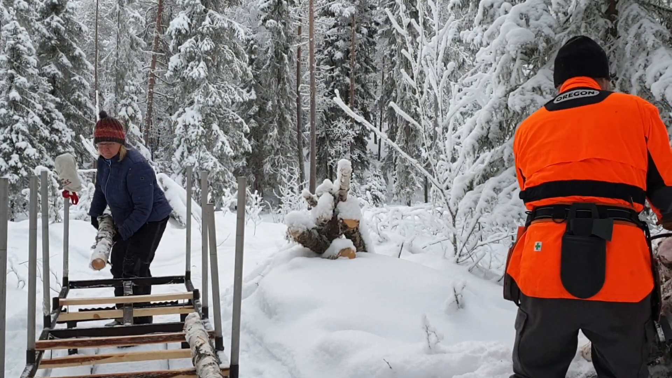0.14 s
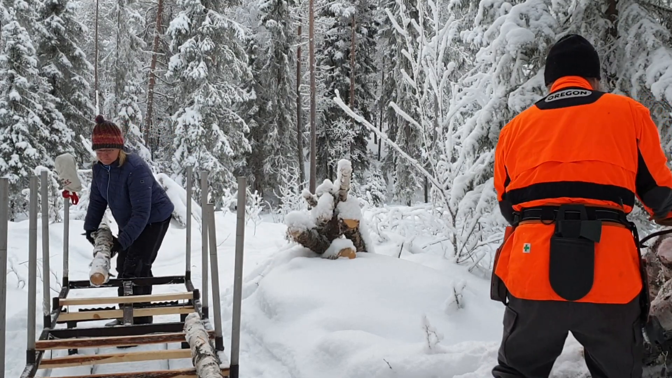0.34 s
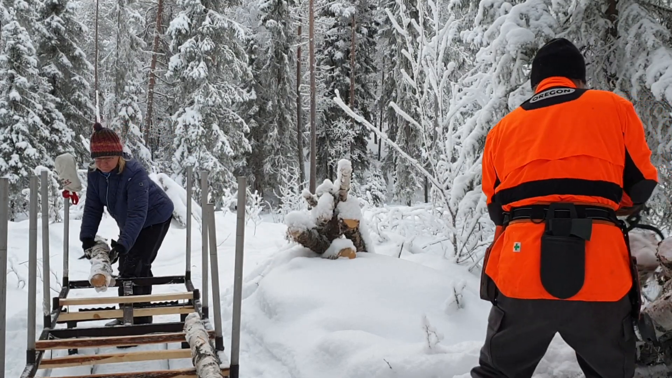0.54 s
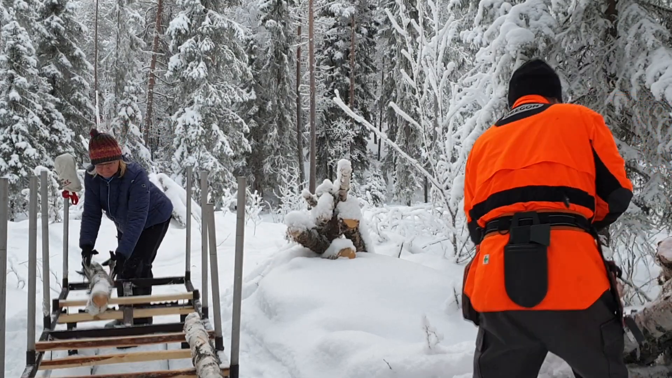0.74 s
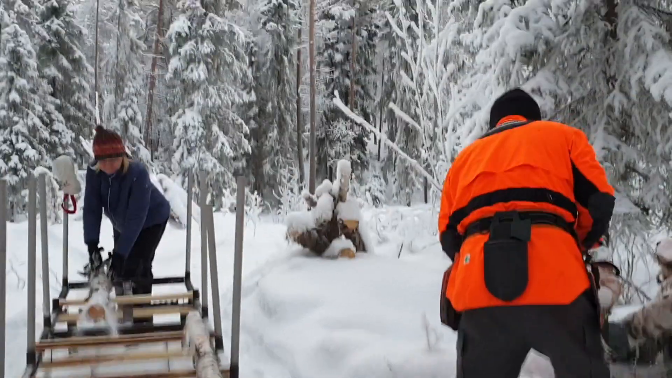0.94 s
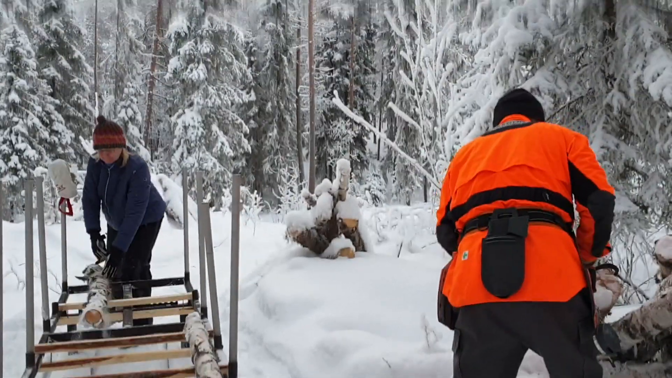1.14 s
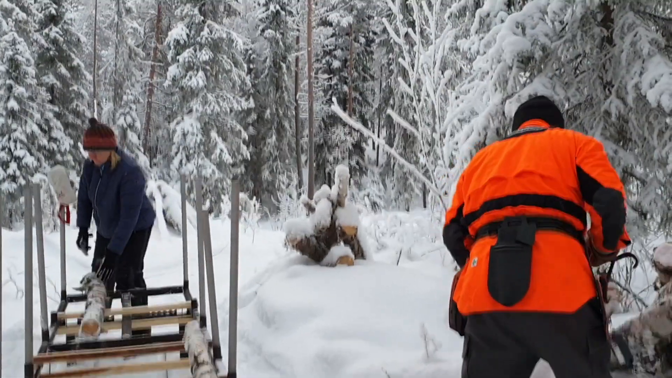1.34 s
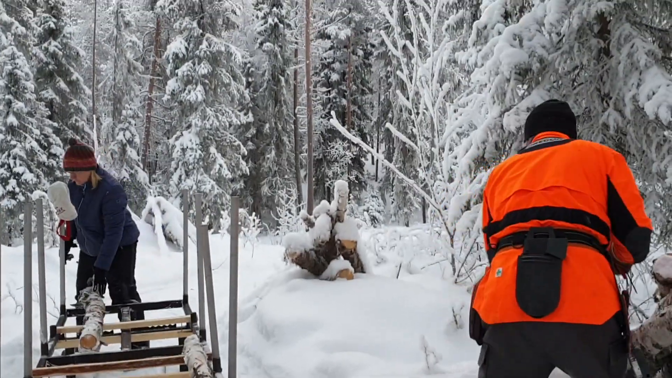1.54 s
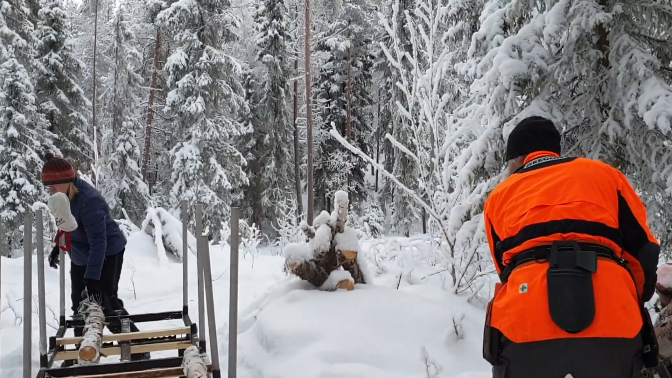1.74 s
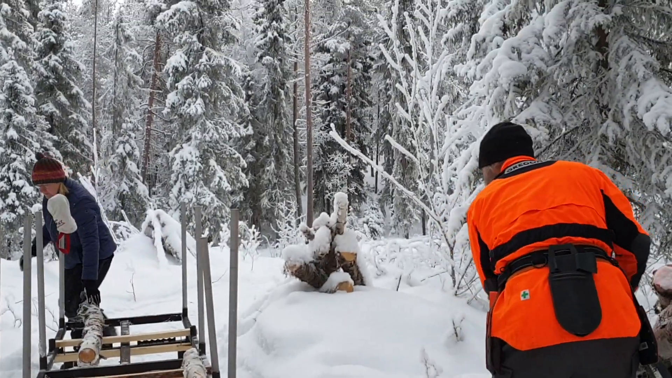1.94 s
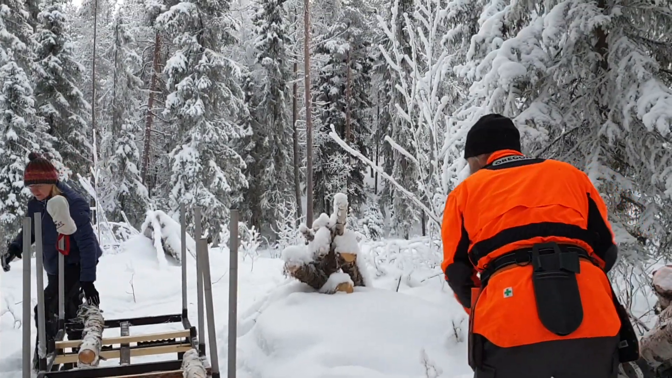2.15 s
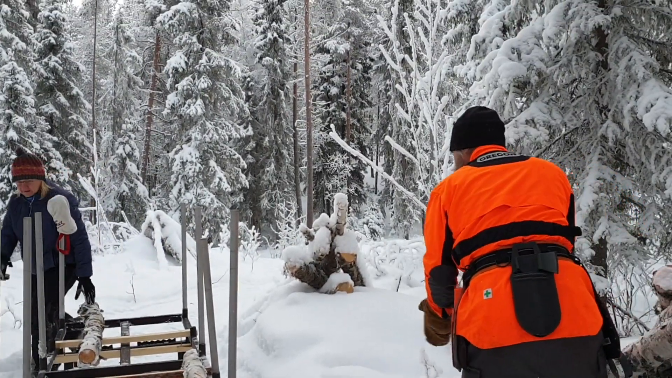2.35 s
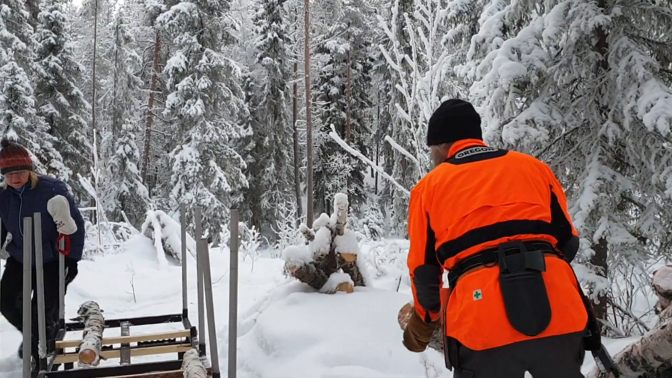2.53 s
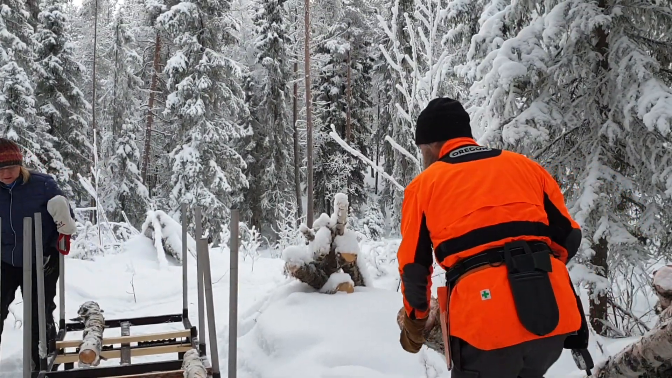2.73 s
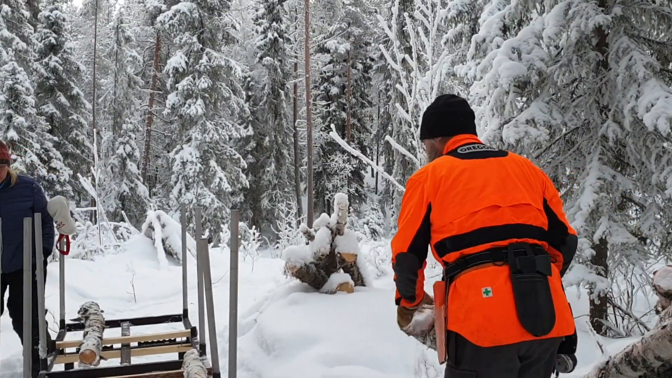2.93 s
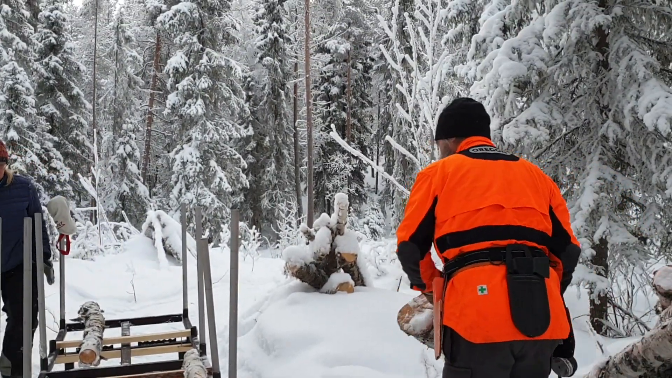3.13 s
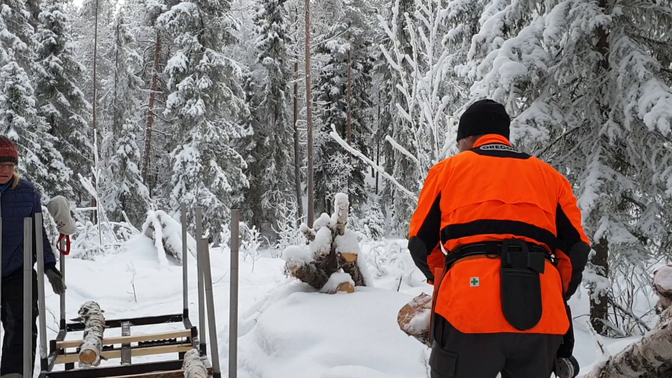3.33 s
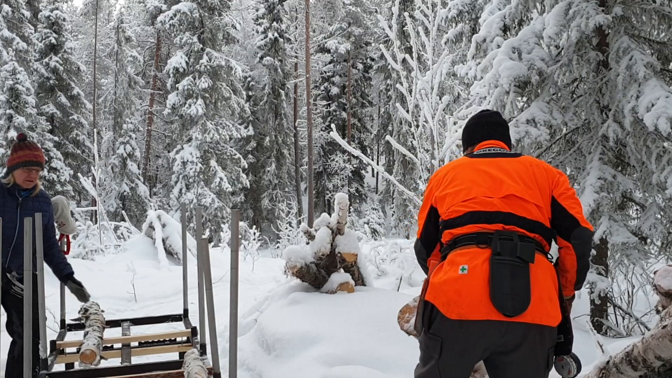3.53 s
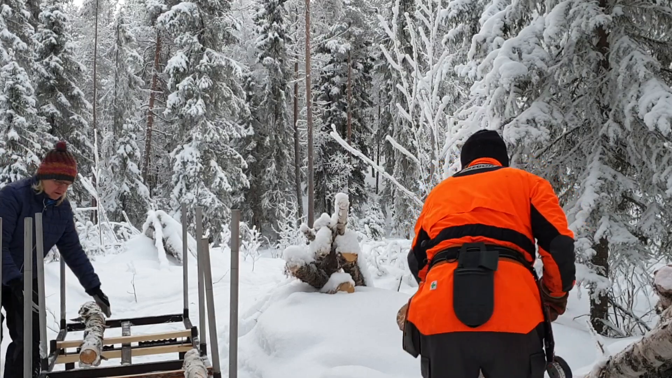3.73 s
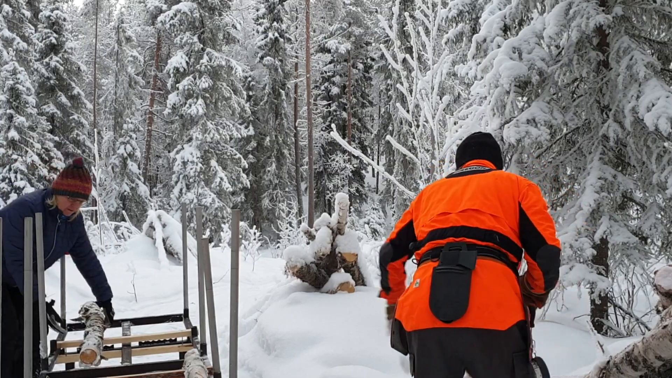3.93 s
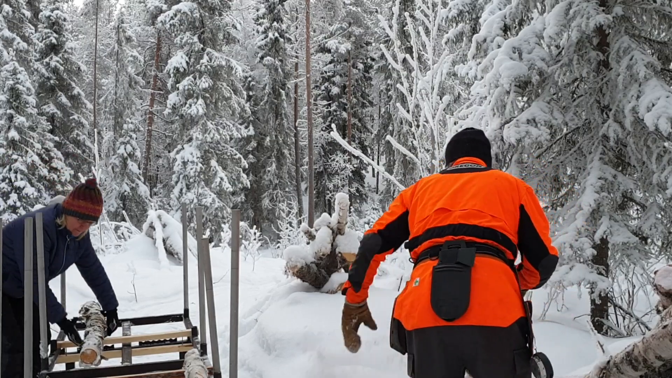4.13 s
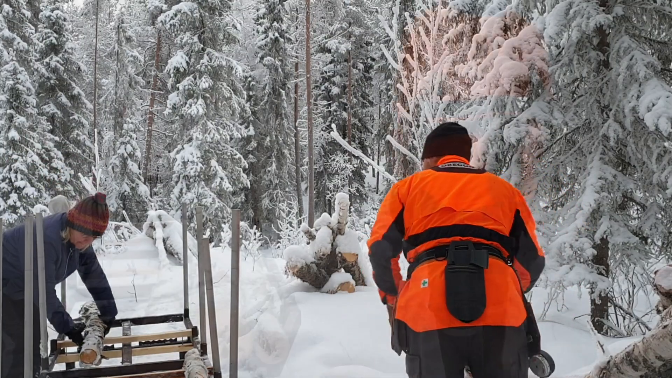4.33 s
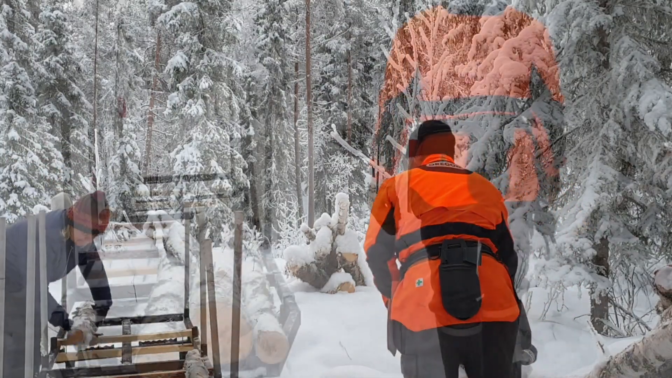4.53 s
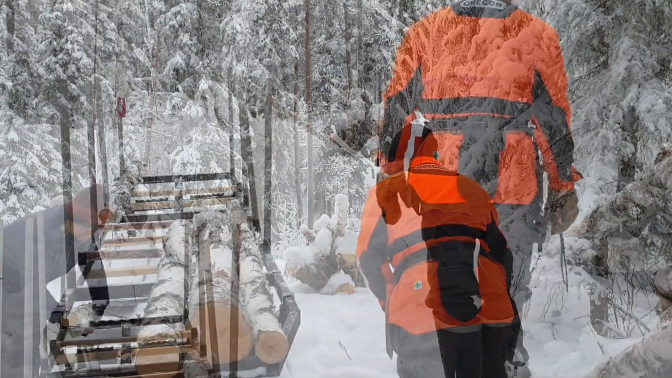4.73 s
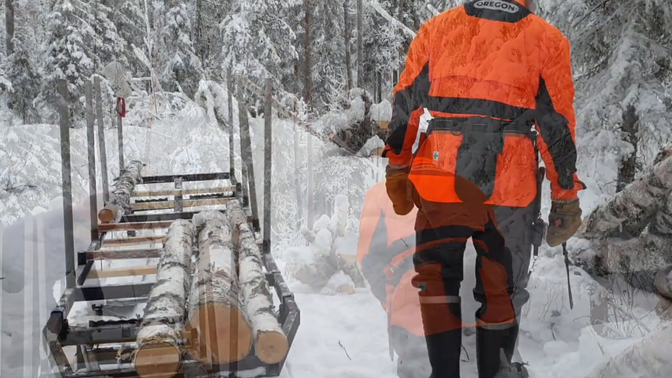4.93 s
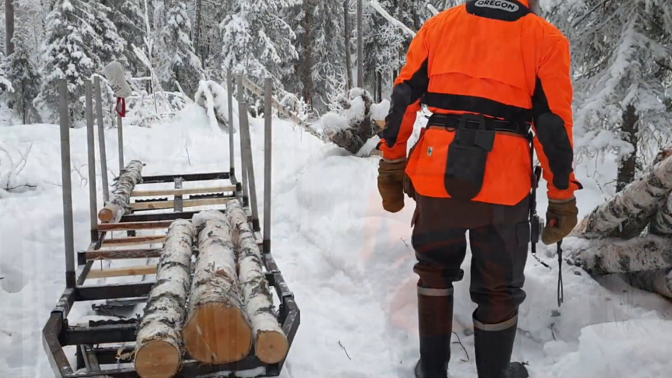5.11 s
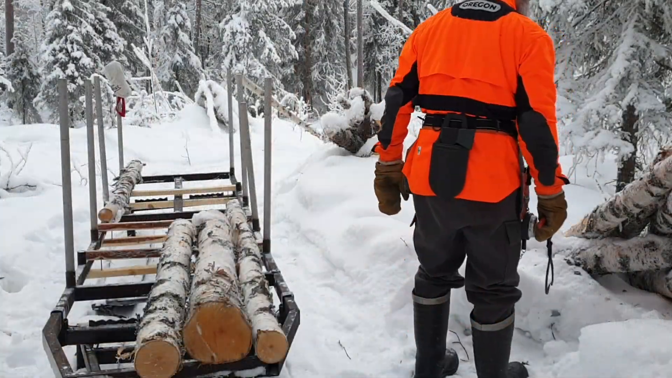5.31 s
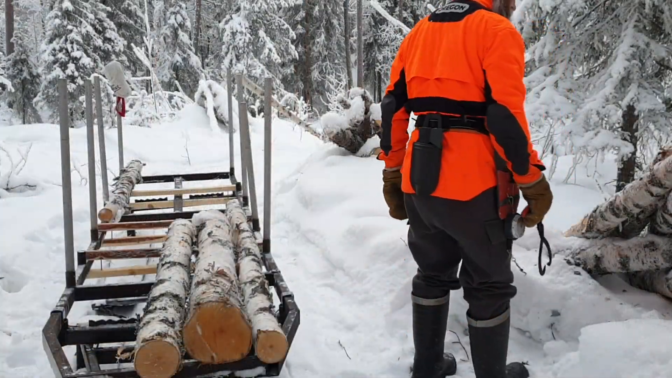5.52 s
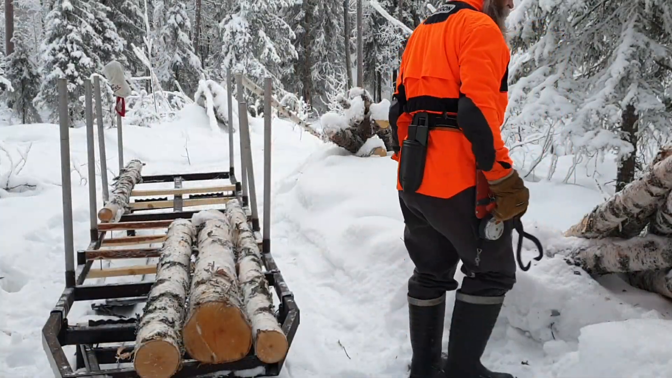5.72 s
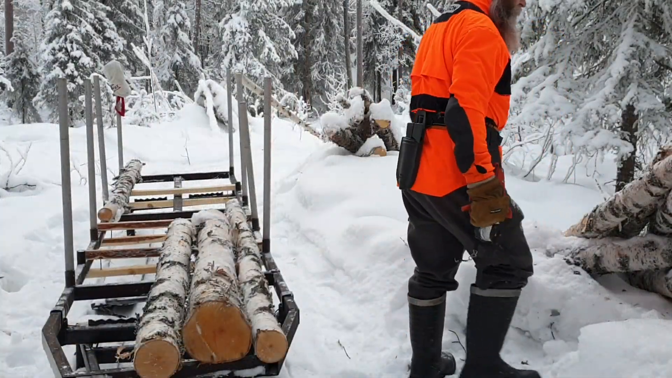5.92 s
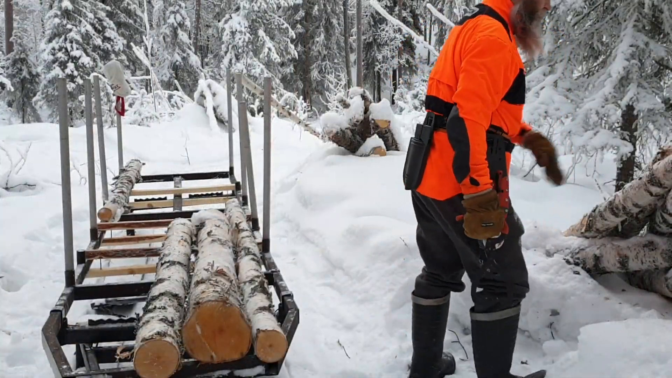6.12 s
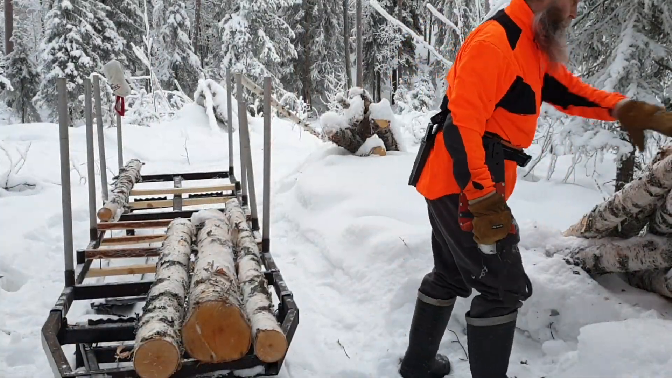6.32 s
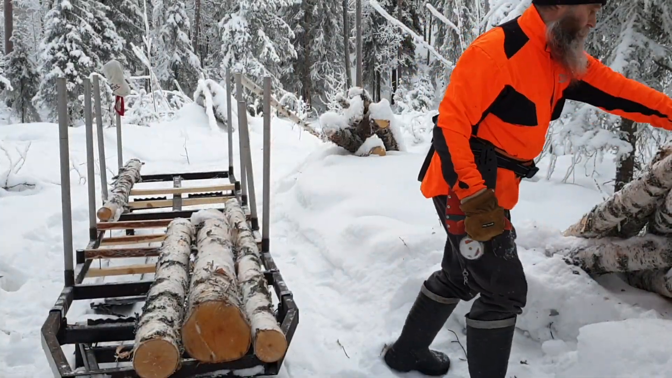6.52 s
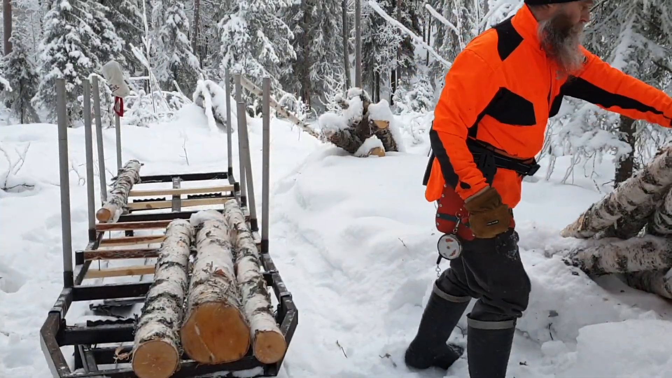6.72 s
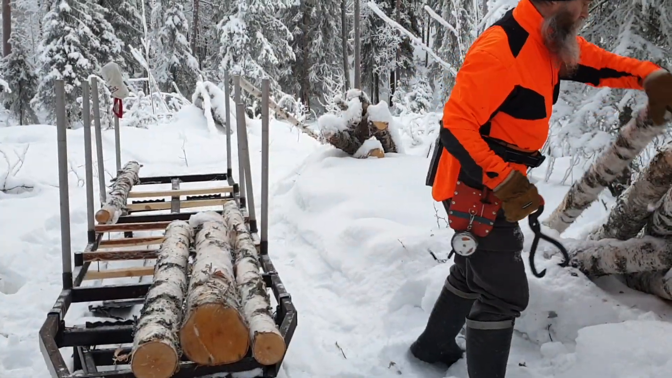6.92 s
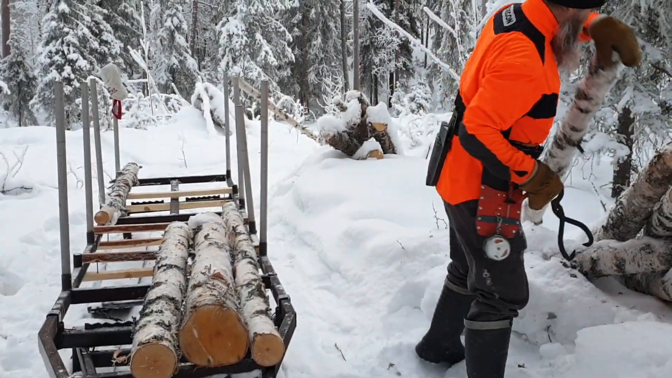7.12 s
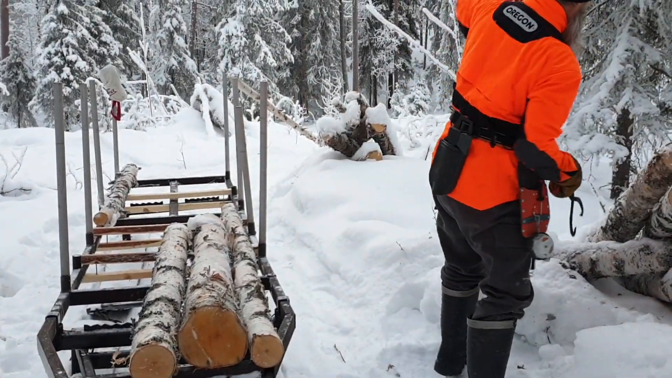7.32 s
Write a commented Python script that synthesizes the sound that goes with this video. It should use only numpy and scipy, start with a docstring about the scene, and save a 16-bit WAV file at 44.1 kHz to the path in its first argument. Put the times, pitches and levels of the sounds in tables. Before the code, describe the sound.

A heavy log crashes onto a slatted steel sled and bounces, overloading the microphone; then snow crunches, tools clink, and another log softly knocks.

```python
"""Snowy forest: a log is dropped on a slatted steel sled and bounces; later another is shifted and knocks.
Blows ring damped frame and wood modes and throw enveloped noise; belt tools clink as chattering contacts.
Boots press the snow and bark rasps as ringing grains; stiff clothes rustle as flickering noise.
Dull echoes follow the hits, faint air noise lies below, and the loudest blows overload the recorder."""
import sys
import numpy as np
from scipy import signal
from scipy.io import wavfile

SR = 44100
rng = np.random.default_rng(int(sys.argv[2]) if len(sys.argv) > 2 else 0)


def pcm_store(signal):
    """Save signal as 16-bit PCM."""
    levels = np.round(np.clip(np.atleast_2d(signal), -1, 1) * 32767)
    wavfile.write(sys.argv[1], SR, levels.astype(np.int16).T)


N = 328986

# All table levels are drives, ahead of later gains and filters.
# log blows; the tilt follows where the log lands, the spray is bark and snow:
# start_s, boom_db, boom_tilt_db_per_octave, knock_db, spray_db
LOG_BLOWS = [(0.750, 1.5, 0, -6, -18), (0.796, 1, -9, -7.5, -17.5), (0.832, -5.5, -12.5, -21, -15.5),
             (0.862, -6, -1, -14.5, -27), (0.909, -9.5, -11, -24.5, -42), (0.945, -2.5, 5, -16.5, -32),
             (1.071, -10, 6, -24, -26), (1.114, -5, -7, -23, -55), (1.271, -16, -3, -35, -52),
             (1.313, -10.5, 7.5, -23, -31.5), (1.349, -12, 7.5, -31, -74), (1.528, -18.5, 3, -24, -42),
             (4.339, -32.5, -7, -37, -60), (4.452, -16, 5.5, -28.5, -39), (4.502, -20, 4.5, -43, -48),
             (4.586, -18, -0.5, -28, -44.5), (4.786, -21, -0.5, -25, -39.5), (4.811, -26, -3, -39, -52),
             (5.026, -29, 6, -31.5, -46), (7.038, -31, 4, -37, -42.5)]
# steel frame modes: pitch_hz, level_db, t60_s
FRAME_MODES = [(52.3, -21.5, 0.14), (84, -13, 0.084), (103.4, -2, 0.3), (129, -0.5, 0.093),
               (184.25, -3.5, 0.32), (226.4, -9, 0.2)]
# log wood modes: pitch_hz, level_db, t60_s
WOOD_MODES = [(300, 8.5, 0.032), (349, 0, 0.097), (454, 4, 0.058), (504.8, 4, 0.043), (629, 0, 0.039),
              (728.5, -4.5, 0.08), (966, -6, 0.033)]
# bark and snow spray spectrum: freq_hz, density_db_per_hz
SPRAY_SPECTRUM = [(590, -23.5), (1000, 3.5), (1560, -1), (15500, -19)]
# small dry knocks and snaps of wood and crust: start_s, level_db, pitch_hz
DRY_KNOCKS = [(0.099, -26, 545), (0.205, -23, 566), (0.458, -31, 664), (1.675, -25, 714),
              (1.812, -21.5, 970), (2.174, -18.5, 70), (2.527, -25, 546), (2.838, -29, 590),
              (3.27, -27.5, 457), (4.202, -27, 1180), (4.25, -29, 626), (6.332, -20.5, 4340),
              (6.691, -29.5, 350), (6.99, -28.5, 313), (7.0383, -12.5, 247), (7.0404, -15, 935),
              (7.043, -21, 362), (7.101, -42, 404), (7.159, -31, 350), (7.252, -30, 300), (7.289, -31, 316),
              (7.326, -29, 280), (7.388, -32.5, 268)]
# metal tools touching: start_s, level_db
TOOL_CLINKS = [(0.705, -26), (1.1978, -19.5), (1.224, -27.5), (1.28, -22), (1.329, -11.5), (1.362, -18.5),
               (1.337, -25), (1.452, -16), (1.552, -29.5), (1.585, -28.5), (1.673, -29.5), (1.717, -30),
               (1.774, -32.5), (1.813, -28), (2.5464, -23.5), (2.613, -16.5), (2.978, -33), (4.485, -28),
               (4.588, -21.5), (4.811, -25.5), (5.7695, -35.5)]
# metal tool modes: pitch_hz, level_db, t60_s
TOOL_MODES = [(3700, -5, .008), (5900, -6, .008), (8300, -5, 0.015), (10700, -8, .035), (13450, -6, .015)]
# steel stake struck: start_s, level_db
STAKE_PINGS = [(.87, -36), (.975, -36), (1.38, -50), (1.82, -50), (4.455, -46)]
# steel stake mode: pitch_hz, level_db, t60_s
STAKE_MODES = [(2846, -4, 0.4)]
# bark and crust rasping: start_s, end_s, level_db, pitch_hz
BARK_RASPS = [(0.971, 1.016, -34.5, 2640), (3.727, 3.812, -41, 1020), (3.85, 3.956, -45, 1290),
              (3.964, 4.01, -43, 2170), (4.443, 4.496, -50, 2700), (4.865, 4.912, -38, 1680),
              (5.966, 6.013, -47, 1580), (6.277, 6.683, -56, 1530)]
# shuffling underfoot and of clothes: time_s, rumble_db, crunch_db, rustle_db
SHUFFLE_LEVELS = [(0, -51, -56, -63.5), (.4, -42, -56.5, -55.5), (1.502, -37.5, -44, -50.5),
                  (1.95, -46, -53.5, -68), (2.698, -53, -57, -57.5), (3.362, -50.5, -65, -68),
                  (3.44, -46, -51, -60.5), (4.1, -53.5, -48, -53), (4.25, -39, -57.5, -58),
                  (5.1, -38.5, -60, -59), (5.199, -75, -88.5, -82), (5.33, -84, -77, -67.5),
                  (5.902, -86.5, -74.5, -64), (6.041, -54.5, -59, -62.5), (6.3, -53.5, -58, -54),
                  (7.46, -56, -56.5, -55.5)]
# boots pressing the snow: start_s, length_s, packing_db, crust_db
BOOT_STEPS = [(0.085, 0.086, -39, -46), (0.168, 0.12, -67, -43), (0.655, 0.84, -37, -37.5),
              (2.176, 0.16, -42.5, -54), (2.482, 0.089, -43, -50), (2.832, 0.12, -45, -45),
              (3.151, 0.18, -44, -49.5), (3.549, 0.3, -38, -49), (4.105, 0.14, -44, -50),
              (4.343, 0.16, -41, -48), (5.397, 0.201, -51.5, -58), (5.954, 0.078, -71, -46.5),
              (6.432, 0.047, -44.5, -50), (6.7, 0.21, -40.5, -48)]
# stiff clothes and loose snow swishing: start_s, length_s, level_db
CLOTH_SWISHES = [(0.169, 0.11, -51), (0.386, 0.78, -52.5), (0.686, 0.43, -49.5), (2.162, 0.08, -52),
                 (2.506, 0.1, -48), (2.84, 0.055, -47), (3.075, 0.013, -50), (3.136, 0.052, -54.5),
                 (3.593, 0.23, -47.5), (3.886, 0.13, -47.5), (4.361, 0.031, -48), (4.664, 0.053, -54.5),
                 (4.871, 0.05, -53), (5.955, 0.046, -45.5)]
# cloth spectrum: freq_hz, density_db_per_hz
CLOTH_SPECTRUM = [(1470, -4.5), (3240, -1.5), (11100, -3.5), (15500, -3.5)]
# forest air spectrum: freq_hz, density_db_per_hz
AIR_SPECTRUM = [(18, -30.5), (40, 11.5), (1970, -4), (2760, -15.5), (15500, -15)]

TILT_PIVOT_HZ = 140
JUDDER_DB, JUDDER_T60_S, JUDDERS_PER_S = -8, 0.15, 250  # the log chatters over the slats
CRACK_DB, CRACK_T60_S = 0, 0.014  # sharper onset of the spray
ROCK_RUMBLE_DB, ROCK_RUMBLE_T60_S = -13.5, 0.46  # relative to the boom
ROCK_CRUNCH_DB, ROCK_CRUNCH_T60_S = -17, 0.29  # relative to the knock
KNOCK_CYCLES_TO_60_DB, OVERTONE_RATIO, OVERTONE_SHARE = 7.1, 1.61, 0.15
CHATTER_T60_S, TOOL_RING_DB = 0.05, -23
RASP_GRAINS_PER_S, RASP_SPREAD_RATIO, RASP_CYCLES, RASP_TILT_DB_PER_OCTAVE = 4000, 1.6, 16, -1
# sag: stroke end level as a share of its peak, before the envelope is squared
STEP_RISE_S, STEP_FALL_S, STEP_SAG = 0.014, 0.019, 0.67
SWISH_RISE_S, SWISH_FALL_S, SWISH_SAG = 0.039, 0.06, 0.9
AIR_DB = -68.5
HISS_HZ, HISS_T60_S, HISS_DB = 2850, 0.035, -79
LEFT_LAG_SAMPLES = 4  # the hits reach the left microphone later
RIGHT_BRIGHT_HZ, RIGHT_TREBLE_DB = 920, 4.5  # right louder than left above this pitch
CUTOFF_HZ = 15800


def logs():
    """Each blow booms in the frame, knocks and judders in the wood, and sprays a dying hiss."""
    start_s, boom_db, tilt_db, knock_db, spray_db = np.transpose(LOG_BLOWS)

    boom = 0
    for mode in FRAME_MODES:
        octaves = np.log2(max(mode[0], 100) / TILT_PIVOT_HZ)
        boom = boom + struck([mode], start_s, boom_db + tilt_db * octaves, spread_db=2.0)
    boom = soften(boom, hz=350)

    touches = soften(dying(start_s, knock_db + JUDDER_DB, JUDDER_T60_S), hz=58.5)
    touches = touches * (rng.random(N) < JUDDERS_PER_S / SR)
    judder = sum(ring(amp(db) * touches * rng.standard_normal(N), hz, t60_s)
                 for hz, db, t60_s in WOOD_MODES)
    knock = amp(-3.5) * struck(WOOD_MODES, start_s, knock_db, spread_db=4.0)
    knock = soften(knock + judder, hz=1160)

    hiss_level = soften(dying(start_s, spray_db, t60_s=0.21), hz=91.0)
    crack_level = dying(start_s, spray_db + CRACK_DB, CRACK_T60_S)
    spray_noise = narrowed(coloured(SPRAY_SPECTRUM, patchy_db=1.0), share=0.22)
    return boom + knock + (hiss_level + crack_level) * spray_noise


def rocking(column, level_db, t60_s):
    """Each blow leaves the sled rocking on the snow: an envelope set by one blow level, dying away."""
    blows = np.transpose(LOG_BLOWS)
    return soften(dying(blows[0], blows[column] + level_db, t60_s), hz=41.2)


def knocks():
    """Each knock is one heavily damped ring of a few cycles with an overtone."""
    out = np.zeros(N + SR)
    t = np.arange(SR // 8) / SR
    for start_s, db, hz in DRY_KNOCKS:
        ringing = np.sin(2 * np.pi * hz * t)
        ringing += OVERTONE_SHARE * np.sin(2 * np.pi * OVERTONE_RATIO * hz * t)
        at = round(start_s * SR)
        out[at:at + len(t)] += amp(db - 60 * hz * t / KNOCK_CYCLES_TO_60_DB) * ringing
    return out[:N]


def tools():
    """Chattering contacts scratch the metal and ring its modes unevenly; the stake rings longer."""
    start_s, clink_db = np.transpose(TOOL_CLINKS)
    contacts = narrowed(rng.standard_normal((2, N)), share=0.12) * (rng.random(N) < 0.15)
    uneven_db = 3 * rng.standard_normal((len(start_s), len(TOOL_MODES)))

    def chatter(levels_db):
        """Tiny contacts under a dying envelope."""
        return soften(dying(start_s, levels_db, CHATTER_T60_S), hz=200) * contacts

    scratch = signal.sosfilt(signal.butter(2, 3300, "high", fs=SR, output="sos"), chatter(clink_db))
    rings = sum(ring(chatter(clink_db + mode_db + uneven_db[:, k]), hz, t60_s)
                for k, (hz, mode_db, t60_s) in enumerate(TOOL_MODES))
    stake = struck(STAKE_MODES, *np.transpose(STAKE_PINGS), spread_db=3.5)
    return scratch + amp(TOOL_RING_DB) * rings + stake


def rasps():
    """Bark and crust catch in dense ringing grains around the pitch of each rasp."""
    t = np.arange(N) / SR
    out = 0
    for start_s, end_s, db, hz in BARK_RASPS:
        gate = soften(1.0 * (t > start_s) * (t < end_s), hz=150)
        texture = grains(RASP_GRAINS_PER_S, hz / RASP_SPREAD_RATIO, hz * RASP_SPREAD_RATIO,
                         RASP_CYCLES, uneven_db=3.0, tilt_db=RASP_TILT_DB_PER_OCTAVE)
        out = out + amp(db) * gate * texture
    return out


def moving():
    """Boots and the rocking sled break snow in grains, stiff cloth hisses; bass is alike in both channels."""
    t = np.arange(N) / SR
    time_s, *levels_db = np.transpose(SHUFFLE_LEVELS)
    rumble, shuffle, hiss = (amp(np.interp(t, time_s, db)) for db in levels_db)
    start_s, length_s, pack_db, crust_db = np.transpose(BOOT_STEPS)
    step_shape = STEP_RISE_S, STEP_FALL_S, STEP_SAG

    pack = rumble + strokes(start_s, length_s, pack_db, *step_shape)
    pack = pack + rocking(1, ROCK_RUMBLE_DB, ROCK_RUMBLE_T60_S)
    crunch = shuffle + strokes(start_s, length_s, crust_db, *step_shape)
    crunch = crunch + rocking(3, ROCK_CRUNCH_DB, ROCK_CRUNCH_T60_S)
    rustle = hiss + strokes(*np.transpose(CLOTH_SWISHES), SWISH_RISE_S, SWISH_FALL_S, SWISH_SAG)

    clumps = amp(1.58 * drift(5.8))  # the snow yields in jerks
    packing = grains(800, 57.0, 276, cycles=7.6, uneven_db=1.5, tilt_db=0.0)
    crust = grains(1200, 374.0, 910, cycles=9.1, uneven_db=8.0, tilt_db=-3.5)
    grit = np.array([grains(2500, 919, 3100, cycles=10.0, uneven_db=4.5, tilt_db=-6.0)
                     for side in "LR"])
    scrape = amp(-5.0) * np.sqrt(np.abs(crunch * rustle)) * grit  # where crunch and rustle meet
    snow = clumps * (pack * packing + crunch * crust + scrape)
    return snow + rustle * coloured(CLOTH_SPECTRUM, patchy_db=1.0)


def trees(x):
    """A few faint, dull echoes from trunks, other ones in each channel, weaker with delay."""
    dull = signal.sosfilt(signal.butter(1, [400, 2500], "band", fs=SR, output="sos"), x.mean(axis=0))
    out = np.zeros((2, N))
    for k, lag_s in enumerate(rng.uniform(0.0064, 0.09, 10)):
        lag = int(lag_s * SR)
        sign = (-1) ** (k // 2)
        out[k % 2, lag:] += amp(-150 * lag_s) * dull[:-lag] * sign
    return out


def air():
    """Still forest air: flickering coloured noise and a faint narrow hiss from a noise-driven resonance."""
    hiss = rms_one(ring(rng.standard_normal((2, N)), HISS_HZ, HISS_T60_S))
    return amp(AIR_DB) * coloured(AIR_SPECTRUM, patchy_db=6.5) + amp(HISS_DB) * hiss


def struck(modes, times_s, db, spread_db):
    """Every blow strikes every mode with a strength and sign of its own."""
    chance = rng.standard_normal((len(times_s), len(modes), 2))
    out = 0
    for k, (hz, mode_db, t60_s) in enumerate(modes):
        gains = amp(db + mode_db + spread_db * chance[:, k, 0]) * np.sign(chance[:, k, 1])
        out = out + ring(train(times_s, gains), hz, t60_s)
    return out


def grains(per_s, low_hz, high_hz, cycles, uneven_db, tilt_db):
    """Small breaks of uneven size, each ringing some cycles to -60 dB; tilt per octave; rms 1."""
    sizes = amp(uneven_db * np.minimum(rng.exponential(1, N), 3)) * rng.choice([-1, 1], N)
    clicks = sizes * (rng.random(N) < per_s / SR)
    pitches_hz = np.geomspace(low_hz, high_hz, 12)
    dealt = rng.integers(0, 12, N)
    out = 0
    for k, hz in enumerate(pitches_hz):
        out = out + amp(tilt_db * np.log2(hz / low_hz)) * ring(clicks * (dealt == k), hz, cycles / hz)
    return rms_one(out)


def coloured(spectrum, patchy_db):
    """Noise of its own in each channel, in bands of up to half an octave that flicker; rms 1."""
    hz, level_db = np.transpose(spectrum)
    edges_hz = np.geomspace(hz[0], hz[-1], int(2 * np.log2(hz[-1] / hz[0])) + 2)
    white = rng.standard_normal((2, 2, N))  # neighbouring bands use different noise
    together = drift(36.0)
    out = 0
    for k, (low, high) in enumerate(zip(edges_hz, edges_hz[1:])):
        band = signal.sosfilt(signal.butter(2, [low, high], "band", fs=SR, output="sos"), white[k % 2])
        band_db = np.interp(np.log(low * high) / 2, np.log(hz), level_db)
        flicker_db = patchy_db * (together + 1.9 * drift(6.3))
        out = out + band * amp(band_db + flicker_db)
    return rms_one(out)


def strokes(start_s, length_s, db, rise_s, fall_s, sag):
    """Envelope of many strokes: each swells, sags while it lasts and fades."""
    t = np.arange(N) / SR
    out = 0
    for s, held, level in zip(start_s, length_s, db):
        shape = np.interp(t, [s - rise_s, s, s + held, s + held + fall_s], [0, 1, sag, 0])
        out = out + amp(level) * shape ** 2
    return out


def dying(times_s, db, t60_s):
    """An envelope that jumps at each moment and dies away."""
    return signal.lfilter([1], [1, -amp(-60 / (t60_s * SR))], train(times_s, amp(db)) + 1e-18)


def ring(clicks, hz, t60_s):
    """Two-pole resonance: a unit click sets a sine of about height 1 ringing."""
    r, w = amp(-60 / (t60_s * SR)), 2 * np.pi * hz / SR
    return signal.lfilter([0, np.sin(w)], [1, -2 * r * np.cos(w), r * r], clicks + 1e-18)


def train(times_s, gains):
    """Clicks of the given sizes at the given moments."""
    clicks = np.zeros(N)
    clicks[np.round(times_s * SR).astype(int)] = gains
    return clicks


def soften(x, hz):
    """A slower contact: low-pass."""
    return signal.sosfilt(signal.butter(2, hz, fs=SR, output="sos"), x)


def narrowed(pair, share):
    """Two unrelated channels made partly alike."""
    return np.array([pair[0], share * pair[0] + np.sqrt(1 - share ** 2) * pair[1]])


def drift(corner_hz):
    """Slow chance: noise through a double one-pole low-pass at SR / 40, interpolated; spread 1."""
    r = np.exp(-2 * np.pi * corner_hz * 40 / SR)
    slow = signal.lfilter([1], [1, -2 * r, r * r], rng.standard_normal(N // 40 + 2002))
    slow = slow[2000:]  # settled part
    return np.interp(np.arange(N) / 40, np.arange(len(slow)), rms_one(slow))


def rms_one(x):
    """Scaled to rms 1."""
    return x / np.sqrt(np.mean(x ** 2) + 1e-20)


def amp(db):
    """Gain of a level in dB."""
    return 10 ** (np.asarray(db) / 20)


def scene():
    """Hits with a late left channel and echoes, movement, and the still air."""
    hits = logs() + knocks() + tools() + rasps()
    late = np.array([np.roll(hits[0], LEFT_LAG_SAMPLES), hits[1]])
    return late + amp(-11.5) * trees(hits) + moving() + air()


def record(dry):
    """The microphones lose the deepest bass, the right is brighter; overload clips hard; the top is cut."""
    dry = signal.sosfilt(signal.butter(3, 42, "high", fs=SR, output="sos"), dry)
    treble = signal.sosfilt(signal.butter(1, RIGHT_BRIGHT_HZ, "high", fs=SR, output="sos"), dry)
    treble_gain = amp([[-RIGHT_TREBLE_DB / 2], [RIGHT_TREBLE_DB / 2]])
    heard = dry + treble * (treble_gain - 1)
    clipped = np.clip(heard, -1, 1)
    return signal.sosfilt(signal.cheby2(24, 50, CUTOFF_HZ, fs=SR, output="sos"), clipped)


dry = scene()
out = record(dry)
pcm_store(out)
```